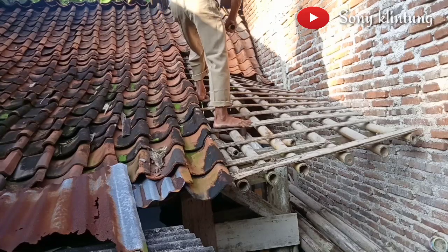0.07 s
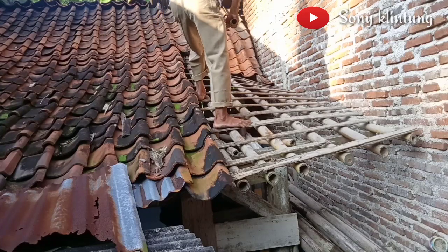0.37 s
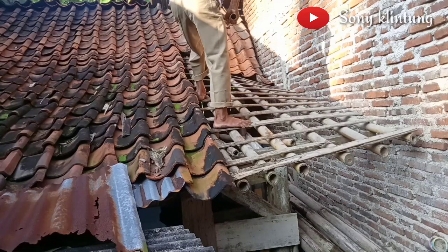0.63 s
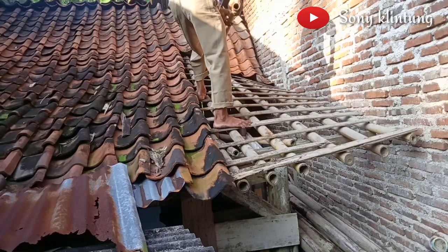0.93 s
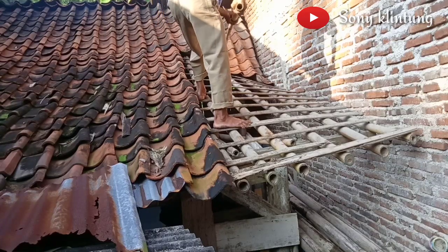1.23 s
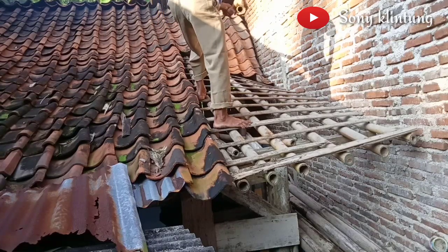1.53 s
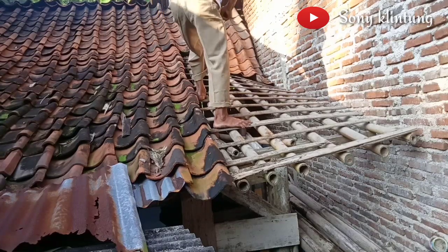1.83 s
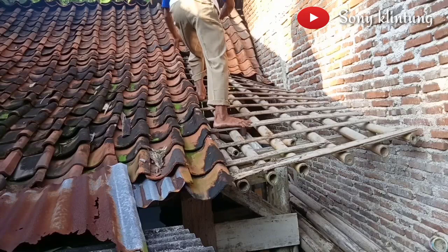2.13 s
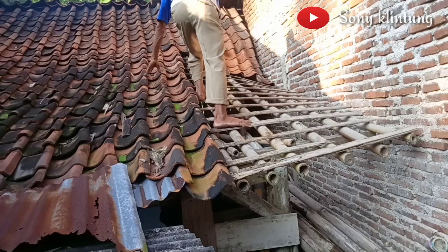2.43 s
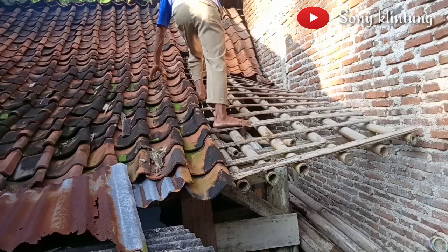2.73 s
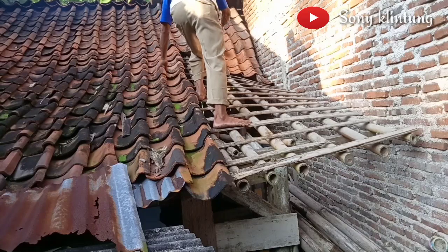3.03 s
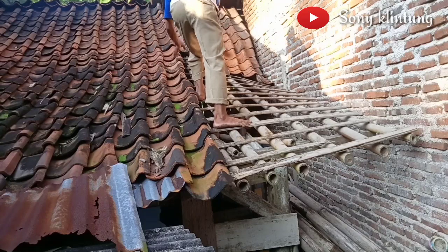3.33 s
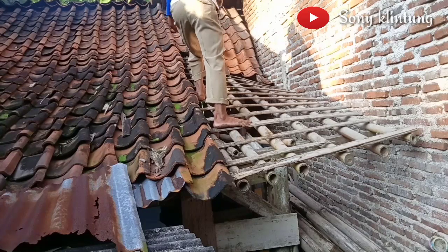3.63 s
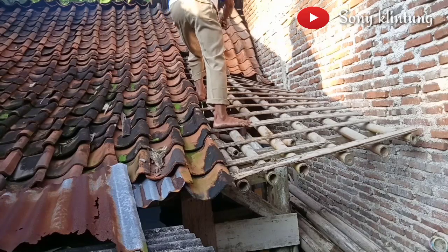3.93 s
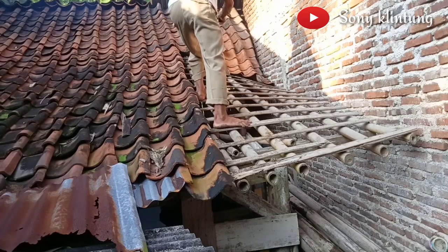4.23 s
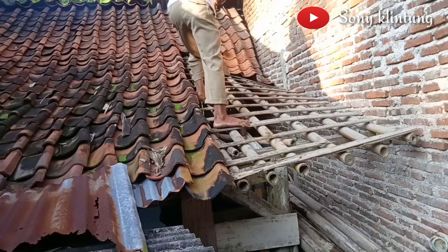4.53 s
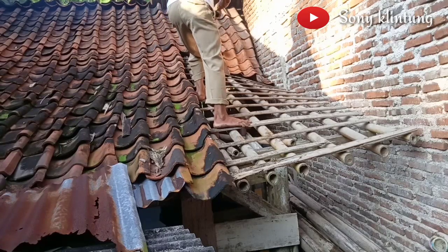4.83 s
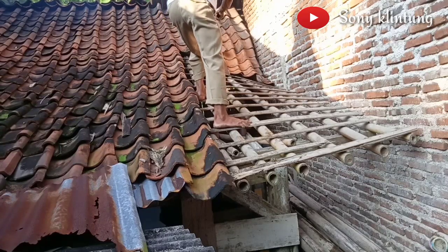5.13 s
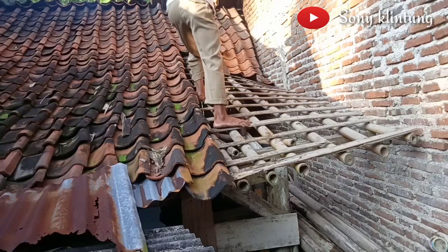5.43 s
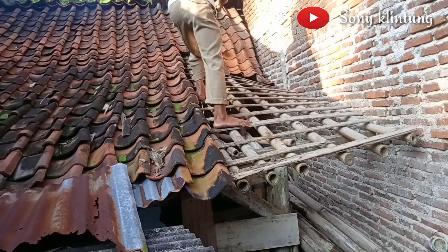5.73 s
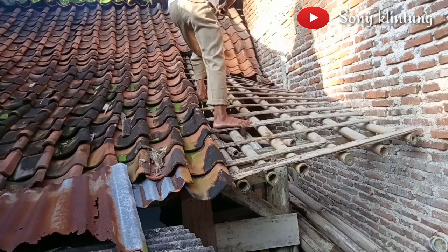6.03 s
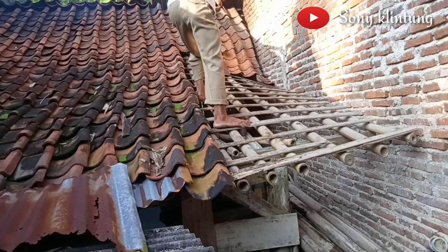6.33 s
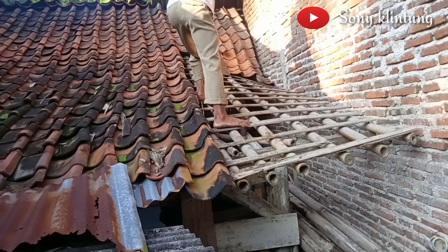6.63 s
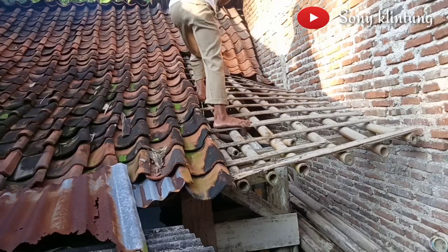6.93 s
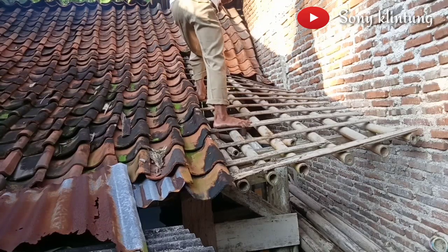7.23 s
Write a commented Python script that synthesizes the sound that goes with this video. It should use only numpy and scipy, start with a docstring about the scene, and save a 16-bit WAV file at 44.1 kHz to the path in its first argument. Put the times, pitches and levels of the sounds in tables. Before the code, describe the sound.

Gritty drags and ringing clinks of clay tiles moved by hand on a roof, with dull bamboo thuds underneath.

```python
"""Clay roof tiles handled on bamboo battens beside a brick wall, over a throbbing rumble and faint hiss.
A tile is dragged for the first second: sandy faces grind, edges knock, the battens thud underneath.
A lull follows, then light taps and shoves from 2.6 s and a second drag from 3.6 s.
From 4.5 s tiles are shoved and set down, clinking; now and then a rubbed one sings.
A last drag runs from 6.9 s to the end, with a squeak and a knock. One microphone hears it all."""
import sys
import numpy as np
from scipy import signal
from scipy.fft import rfft, irfft, next_fast_len
from scipy.io import wavfile
from scipy.ndimage import map_coordinates

SR = 44100
rng = np.random.default_rng(int(sys.argv[2]) if len(sys.argv) > 2 else 0)


def int16_out(signal):
    """Quantize to a 16-bit WAV file."""
    q = np.round(np.clip(np.atleast_2d(signal).T, -1, 1) * 32767)
    wavfile.write(sys.argv[1], SR, q.astype(np.int16))


N = 325899
TIME_S = np.arange(N) / SR


def amp(db):
    return 10 ** (np.asarray(db) / 20)


def unit(x, size=None):
    """Scale x so its first size samples have rms 1."""
    return x / np.sqrt(np.mean(x[:size] ** 2) + 1e-20)


def curves(rows):
    """One value per sample for each column after the time."""
    times_s, *columns = np.transpose(rows)
    return [np.interp(TIME_S, times_s, column) for column in columns]


def wobble(knots_per_s):
    """Smooth random curve."""
    knots = rng.standard_normal(int(N * knots_per_s / SR) + 4)
    return map_coordinates(knots, [TIME_S * knots_per_s])


def add(track, start_s, sound):
    part = track[max(0, round(start_s * SR)):][:len(sound)]
    part += sound[:len(part)]


def filtered(x, response):
    """Multiply the spectrum of x by response(hz)."""
    size = next_fast_len(len(x) + 4096)
    return irfft(rfft(x, size) * response(np.fft.rfftfreq(size, 1 / SR)), size)[:len(x)]


def body(spectrum, size=2048):
    """Minimum-phase impulse response from rows of freq_hz, gain_db."""
    hz, db = np.transpose(spectrum)
    gain = amp(np.interp(np.log(np.fft.rfftfreq(size, 1 / SR) + 1), np.log(hz), db))
    cepstrum = irfft(np.log(gain))
    cepstrum[1:size // 2] *= 2
    cepstrum[size // 2 + 1:] = 0
    return irfft(np.exp(rfft(cepstrum)))


def through(x, impulse_response):
    return signal.fftconvolve(x, impulse_response)[:len(x)]


# Background spectra: freq_hz, gain_db
RUMBLE_SPECTRUM = [(20, -30), (45, -22.5), (70, -10.5), (100, 0), (150, -1), (220, -15.5), (280, -8),
                   (370, -11), (600, -19.5), (1300, -29), (3000, -46)]
HISS_SPECTRUM = [(200, -3), (700, 2), (1500, -2), (2400, -6), (3300, 1), (5300, -17.5), (7700, -6.5),
                 (10000, -20), (13000, -21), (14500, -11.5), (16000, -21)]
# Background levels: time_s, rumble_db, drone_db
DISTANT_LEVELS = [(0, -58, -57.5), (1.2, -57.5, -60), (1.42, -58, -52.5), (1.65, -58, -55),
                  (1.8, -59, -59.5), (2.05, -59, -63), (2.3, -60, -58.5), (3.0, -59, -60), (4.1, -51, -56),
                  (4.45, -60.5, -68.5), (5.0, -55.5, -63), (6.0, -55.5, -63.5), (6.3, -60, -64),
                  (7.39, -52.5, -60)]


def outdoors(hiss_db=-68, throb_db=1.5, drone_hz=221, drone_width_hz=75):
    """Far throbbing rumble, hollow drone like a distant motor, faint even hiss."""
    rumble_db, drone_db = curves(DISTANT_LEVELS)
    rumble = through(rng.standard_normal(N), body(RUMBLE_SPECTRUM))
    rumble = unit(rumble * amp(throb_db * wobble(45)))
    drone_band = lambda hz: 1 / (1 + np.abs(2 * (hz - drone_hz) / drone_width_hz) ** 3)
    drone = unit(filtered(rng.standard_normal(N), drone_band))
    hiss = unit(through(rng.standard_normal(N), body(HISS_SPECTRUM)))
    return amp(rumble_db) * rumble + amp(drone_db) * drone + amp(hiss_db) * hiss


def contacts(rate_per_s, spread_db, size):
    """Tiny collisions, random in time and strength."""
    hit = rng.random(size) < rate_per_s / SR
    strength = amp(spread_db * rng.standard_normal(size))
    return hit * strength * rng.choice([-1, 1], size)


# Squeak partials: pitch_ratio, gain_db
SQUEAK_MODES = [(1, 3.5), (1.66, -10), (2.7, -20.5)]
# Squeaks of rubbed tiles, plus one short, broad knock at 7.12 s:
# start_s, length_s, pitch_hz, width_hz, level_db
SQUEAKS_AND_KNOCK = [(.002, .093, 2570, 229.7, -41), (.01, .07, 1380, 110, -42),
                     (0.181, .05, 1334, 180, -34.5), (0.412, .2, 2620, 450, -48),
                     (.905, .045, 1480, 36.5, -32), (4.216, 0.0606, 977, 60, -51),
                     (4.83, .24, 1830, 130, -60), (5.181, 0.038, 3310, 805, -42),
                     (5.182, 0.14, 1020, 170, -48.5), (5.219, 0.049, 2460, 260, -42.5),
                     (5.291, 0.031, 2850, 600, -40), (5.345, .04, 2760, 250, -39.5),
                     (5.304, .026, 13000, 1800, -54.5), (5.857, .2, 3020, 460, -55),
                     (7.031, 0.096, 1910, 280, -31.5), (7.12, 0.036, 1730, 1200, -28)]


def singing():
    """Uneven slips keep a tile ringing in a hoarse squeak; the last, broad burst sounds as a knock."""
    track = np.zeros(N)
    for start_s, length_s, pitch_hz, width_hz, level_db in SQUEAKS_AND_KNOCK:
        slips = contacts(3000, 4.2, SR // 2)
        band = lambda hz: (1j * hz * width_hz / (pitch_hz ** 2 - hz ** 2 + 1j * hz * width_hz)) ** 2
        ring = filtered(slips, lambda hz: sum(amp(db) * band(hz / ratio) for ratio, db in SQUEAK_MODES))
        progress = np.linspace(0, 1, round(length_s * SR))
        swell = np.sqrt(progress) * (1 - progress ** 2)
        add(track, start_s, amp(level_db) * unit(ring[-len(swell):] * swell))
    return track


# Bamboo batten spectrum: freq_hz, gain_db
BATTEN_SPECTRUM = [(45, -27.5), (100, -12), (170, -4.5), (260, -3.5), (400, -3), (530, -4.5), (750, -6.5),
                   (1500, -40)]


def battens(force):
    """The battens answer a force with a dull, low sound."""
    return through(force, body(BATTEN_SPECTRUM))


# Gritty hiss as the microphone colours it, with the microphone's peak near 8 kHz: freq_hz, gain_db
GRIT_AT_MIC_SPECTRUM = [(2500, -37), (4600, -12), (5700, -8), (6800, -4.5), (7900, 2.5), (8800, -5.5),
                        (10000, -13.5), (12500, -18.5), (15500, -13)]


def sand(force, level_db, rms_samples=None, dust_hz=10600, firm_rub_db=-40):
    """Grit hiss, coloured by the microphone; a light touch moves only fine dust and hisses higher."""
    grit = unit(through(force, body(GRIT_AT_MIC_SPECTRUM)), rms_samples)
    dust = filtered(grit, lambda hz: 1 - 1 / (1 + (hz / dust_hz) ** 8))
    lift_db = np.minimum(0.2 * (firm_rub_db - level_db) - 1, 6)
    return amp(level_db) * (grit + (amp(lift_db) - 1) * dust)


# Fired clay spectrum: freq_hz, gain_db
CLAY_SPECTRUM = [(250, -49), (480, -10), (600, -7.5), (850, 0), (1350, 0.5), (1900, -1.5), (2700, -1.5),
                 (3500, -3.5), (4200, -8.5), (5200, -21), (7500, -48)]
# Resonances shared by all tiles: freq_hz, t60_s, gain_db
CLAY_MODES = [(583, 0.035, -0.5), (834, 0.03, -3.5), (975, 0.052, -2), (1108, 0.22, -6.5),
              (1327, 0.16, -1.5), (1779, 0.081, 4), (1865, .06, -9), (2240, 0.25, -9.5), (2630, .06, -0.5),
              (2780, .05, -13), (3196, 0.065, -10), (3510, 0.08, -6), (3760, 0.028, -5.5)]


def fired_clay(force, resonance_db=-4):
    """A tile answers a force with a broad hard-clay colour and the shared resonances."""
    t = np.arange(SR // 8) / SR
    response = np.zeros(len(t))
    response[0] = 1
    for freq_hz, t60_s, gain_db in CLAY_MODES:
        fade = amp(-60 * t / t60_s)
        response += amp(resonance_db + gain_db) * 2 * fade / fade.sum() * np.cos(2 * np.pi * freq_hz * t)
    response = through(response, body(CLAY_SPECTRUM))
    bass_cut = signal.butter(2, 200, "highpass", fs=SR)  # a small plate radiates no bass
    return through(force, signal.lfilter(*bass_cut, response))


def brighten(x, bright_db, pivot_hz=2000):
    """Sharp contact favours a tile's high modes, flat contact its low ones."""
    low = filtered(x, lambda hz: 1 / (1 + (hz / pivot_hz) ** 4))
    return low * amp(-bright_db / 2) + (x - low) * amp(bright_db / 2)


def dense_ring(t60_s, count=150, low_hz=500, high_hz=15000):
    """Crowded weak modes with the given decay, drawn afresh on every call."""
    t = np.arange(min(round(t60_s * SR), SR // 3) + 2) / SR
    hz = low_hz * (high_hz / low_hz) ** ((np.arange(count) + rng.random(count)) / count)
    spectrum = np.zeros(SR // 2 + 1, complex)
    spectrum[hz.astype(int)] = np.sqrt(hz) * np.exp(2j * np.pi * rng.random(count))
    ring = irfft(spectrum)[:len(t)] * amp(-60 * t / t60_s)
    return ring / np.linalg.norm(ring)


def chatter(t, t60_s, ring_db, ring_t60_s, rise_share, wall_db=-26, wall_t60_s=0.34):
    """A blow is a tight cluster of contacts and roof reflections; tiles ring on, the wall answers."""
    fade = amp(-60 * np.maximum(t - 0.1 * t60_s, 0) / t60_s)
    cluster = fade * unit(contacts(5000, 1.7, len(t)))
    add(cluster, 0, amp(ring_db) * np.linalg.norm(cluster) * dense_ring(ring_t60_s, count=64))
    wall = amp(wall_db - 60 * t / wall_t60_s) * rng.standard_normal(len(t))
    rise = 1 - np.exp(-t / (rise_share * t60_s))  # longer blows start more softly
    return (cluster + wall) * rise


# Modes of one curved clay plate: pitch_ratio, gain_db
PLATE_MODES = [(1.002, 2.5), (1.4, -3), (1.84, -7.5), (2.119, -1), (2.908, 2), (3.55, -6), (4.12, -2.5)]


def clink(t, pitch_hz, centre_hz, t60_s, rise_s=0.0015, scatter_db=1, slope_db_per_octave=10):
    """The struck plate's own modes; the contact point favours those near centre_hz."""
    ratio, gain_db = np.transpose(PLATE_MODES)
    hz = ratio * pitch_hz
    octaves_off = np.abs(np.log2(hz / centre_hz))
    gain = amp(gain_db - slope_db_per_octave * octaves_off - scatter_db * rng.standard_normal(len(hz)))
    modes = gain @ np.sin(2 * np.pi * (hz[:, None] * t + rng.random((len(hz), 1))))
    return modes * amp(-60 * t / t60_s) * (1 - np.exp(-t / rise_s))


# Tile-on-tile blows:
# start_s, clay_db, bright_db, grit_db, batten_db, chatter_t60_s, pitch_hz, centre_hz, clink_db
TILE_KNOCKS = [(0.253, -25.5, -8.5, -35.5, -42.5, 0.23, 1037, 1200, -31),
               (0.786, -32.5, -2.5, -43.5, -46, 0.19, 890, 2500, -36),
               (0.849, -20.5, -11, -46.5, -32, .14, 1047, 2200, -31),
               (0.894, -22.5, -1, -38.5, -34.5, 0.093, 952, 1380, -24.5),
               (0.919, -30, -14, -56.5, -36.5, 0.21, 1062, 1600, -34.5),
               (1.102, -35, -13, -52, -46, 0.19, 890, 1200, -50),
               (1.242, -46, 6, -50.5, -55, .18, 980, 2500, -54),
               (2.593, -47.5, -6, -64.5, -43, 0.21, 962, 1390, -51),
               (2.703, -50.5, 6, -55, -48.5, 0.194, 833, 1790, -50),
               (2.726, -53, 2, -65, -49, 0.25, 848, 1500, -47.5),
               (2.841, -60, 6, -59, -63, 0.161, 842, 1800, -52),
               (2.856, -54, 10, -50.5, -60, .07, 840, 3000, -53),
               (2.917, -50, 7, -51.5, -62, 0.15, 1145, 2360, -52.5),
               (3.075, -58, -4, -61, -74, .12, 1014, 1900, -68),
               (3.224, -42, -3, -49.5, -60, 0.23, 966, 1490, -39.5),
               (3.238, -39.5, -1, -42.5, -63, 0.071, 965, 2000, -47),
               (3.325, -48, -12, -63, -64, .1, 969, 1300, -41.5),
               (3.428, -39.5, 3, -45, -42, 0.19, 969, 1330, -40.5),
               (3.558, -52, 8, -51, -70.5, 0.13, 1010, 2900, -60),
               (3.608, -42.5, 16, -53, -49.5, .1, 950, 1340, -46),
               (3.782, -31.5, 3.5, -39.5, -39.5, .1, 1067, 1900, -41),
               (3.8414, -21.5, 0.5, -30, -43.5, 0.039, 878, 1850, -20),
               (3.883, -30, -5.5, -51.5, -43, 0.04, 902, 1900, -28.5),
               (4.187, -43.5, 3, -43, -50, .081, 973, 990, -34.5),
               (4.194, -51.5, 3, -47, -54.5, 0.062, 960, 2800, -39),
               (4.547, -36, -9, -48, -37.5, 0.15, 1019, 1490, -41),
               (4.566, -44, -5, -49.5, -39, 0.096, 988, 1170, -36),
               (4.659, -57, 4, -57, -43, 0.2, 556, 560, -50),
               (4.688, -62, 6, -53, -59, .08, 990, 3000, -66),
               (4.761, -44, -3, -55.5, -63.5, 0.2, 835, 2820, -55),
               (5.067, -31.5, 0, -35, -44, 0.13, 1017, 3340, -45),
               (5.182, -52, 12, -46.5, -66, .08, 1020, 3000, -50),
               (5.301, -41.5, 21, -45, -59, 0.086, 987, 3000, -41.5),
               (5.355, -37, -1, -35.5, -48, 0.097, 928, 2700, -39.5),
               (5.473, -39, -10, -65.5, -41.5, 0.15, 816, 820, -38.5),
               (5.551, -24.5, -5.5, -42, -41, .14, 934, 1620, -31.5),
               (5.597, -33, -18, -59, -43, 0.12, 837, 1200, -40),
               (5.74, -38, -10, -56.5, -39.5, 0.18, 848, 840, -39.5),
               (5.799, -45, 5, -58.5, -60.5, .087, 1005, 2880, -52),
               (5.851, -52, -5, -58, -45.5, 0.092, 677, 700, -57),
               (6.002, -47, 8, -52, -67, 0.074, 1016, 3000, -54),
               (6.394, -55.5, 21, -50.5, -60, 0.077, 1120, 4000, -63),
               (6.431, -52.5, 10.3, -48, -69, 0.087, 1030, 3000, -56),
               (6.5534, -26, -0.5, -43.5, -43.5, 0.073, 827, 1090, -29.5),
               (6.558, -32.5, 2, -49, -53, 0.13, 834.5, 3450, -33)]


def knocks(flex_hz=182, flex_db=-7, flex_t60_s=0.12, touch_lead_s=0.0026, touch_db=-19):
    """Each knock sounds the clay, crushes grit, flexes the battens and clinks at the tile's pitch."""
    track = np.zeros(N)
    t = np.arange(SR // 3) / SR
    head = SR // 40  # levels apply to the first 25 ms
    flex_envelope = amp(-60 * t / flex_t60_s) * (1 - np.exp(-t / 0.0048))
    flex = amp(flex_db) * unit(flex_envelope * np.sin(2 * np.pi * flex_hz * t), head)
    for start_s, clay_db, bright_db, grit_db, batten_db, t60_s, pitch_hz, centre_hz, clink_db in TILE_KNOCKS:
        clay = fired_clay(chatter(t, t60_s, ring_db=-2, ring_t60_s=0.15, rise_share=0.012))
        clay = unit(brighten(clay, bright_db), head)
        grit = sand(chatter(t, t60_s, ring_db=-7, ring_t60_s=0.09, rise_share=0.005), grit_db, head)
        thud = battens(chatter(t, 1.1 * t60_s, ring_db=-11, ring_t60_s=0.05, rise_share=0.016))
        thud = unit(unit(thud, head) + flex, head)
        clink_t60_s = 0.05 + 0.75 * t60_s  # a tightly pinned tile rings less
        ring = unit(clink(t, pitch_hz, centre_hz, clink_t60_s), head)
        blow = amp(clay_db) * clay + grit + amp(batten_db) * thud + amp(clink_db) * ring
        add(track, start_s - touch_lead_s, amp(touch_db) * blow)  # one corner lands first
        add(track, start_s, blow)
    return track


def shove(attack_s, hold_s, speed_exponent=1.17):
    """Gain of a tile that speeds up, slides and stops; loudness follows a power of speed."""
    stop_t60_s = 0.13 + 1.6 * attack_s  # a gentle shove also stops gently
    t = np.arange(round((attack_s + hold_s + stop_t60_s) * SR)) / SR
    speed = np.minimum(t / attack_s, 1)
    return speed ** speed_exponent * amp(-60 * np.maximum(t - attack_s - hold_s, 0) / stop_t60_s)


# Short shoves: start_s, attack_s, hold_s, clay_db, bright_db, grit_db, batten_db
TILE_SHOVES = [(1.059, 0.028, 0.049, -41.5, 0, -51, -42.5), (1.41, 0.15, 0.047, -64.5, 3, -59.5, -69.5),
               (1.753, .015, .015, -68, 4, -64, -76), (1.82, 0.042, .11, -78, 4, -69, -80),
               (1.88, 0.047, 0.013, -63, -24, -81, -63), (2.224, 0.01, 0.0068, -65, 11, -61, -72),
               (2.708, 0.0229, .03, -43, -5.5, -56, -44.5), (2.845, 0.015, 0.0079, -44.5, 2, -51.5, -49),
               (2.917, 0.02, .05, -52, 6, -56, -64.5), (3.064, 0.029, .012, -51.5, 1, -58, -66.5),
               (3.213, 0.037, 0.091, -38, -8, -50, -53.5), (3.431, 0.015, 0.014, -43, -7, -52, -47),
               (3.566, 0.022, .035, -45, 2, -56, -71), (4.168, 0.0236, 0.016, -37.5, -5, -44, -46.5),
               (4.587, 0.039, 0.22, -54.5, 0, -61, -54.5), (4.809, .15, 0.075, -51, 11, -52, -73.5),
               (5.098, .022, .008, -42, -5, -50.5, -55.5), (5.176, 0.0047, 0.0068, -56.5, 9, -46, -53),
               (5.209, 0.013, 0.045, -42.5, 12, -39.5, -62), (5.328, 0.055, 0.011, -37, -8, -47, -45.5),
               (5.62, 0.078, 0.035, -34.5, 5.5, -43.5, -46.5), (5.789, 0.018, 0.23, -50.5, 7, -52.5, -60),
               (6.073, 0.035, 0.16, -67.5, 6, -68.5, -77), (6.142, 0.039, .012, -60, 22, -57, -77),
               (6.261, 0.061, .025, -54.5, 16, -52.5, -62), (6.425, 0.025, 0.074, -69, 7, -65, -68),
               (6.531, 0.097, .02, -44.5, -1, -49, -52), (6.74, 0.075, .012, -37, 1.5, -45, -49)]
# Three long drags, one list each: time_s, clay_db, bright_db, grit_db, batten_db
TILE_DRAGS = [
    [(0, -33, 3, -39, -44.5), (.16, -34.5, 6.5, -39.5, -52.5), (.26, -28.5, 8, -36, -47.5),
     (.5, -37, 4.5, -43, -53.5), (.75, -35, 13.5, -38, -50), (.85, -37, -7, -49, -47.5),
     (1.0, -40, 0, -45.5, -52), (1.07, -45, 5, -52.5, -54.5)],
    [(3.64, -54.5, -14, -61, -58), (3.71, -35, 10, -43.5, -50), (3.77, -40, 1, -51, -48.5),
     (3.82, -30, -0.5, -40.5, -42.5), (3.94, -32, 0, -44, -47), (4.03, -28.5, 1, -38.5, -48.5),
     (4.11, -33, 1, -41, -51.5), (4.18, -46, 0.5, -51, -54)],
    [(6.86, -52, -11, -57.5, -49.5), (6.91, -33, 8, -40.5, -54.5), (7.05, -27.5, 4, -35, -46),
     (7.1, -29, -2.5, -35, -42.5), (7.135, -23.5, 2.5, -35.5, -35), (7.175, -28.5, 0.5, -39, -46),
     (7.22, -26, 1.5, -37.5, -41), (7.27, -35.5, -1, -47, -45), (7.33, -29, 10, -32.5, -46),
     (7.39, -32.5, 2.5, -44, -51.5)],
]


def sliding():
    """Summed clay, grit and batten gains of all shoves and drags, and their brightness in dB."""
    clay, grit, batten, weighted_bright = np.zeros((4, N))
    moves = [(start_s, shove(attack_s, hold_s), *levels)
             for start_s, attack_s, hold_s, *levels in TILE_SHOVES]
    for drag in TILE_DRAGS:
        moving = (TIME_S >= drag[0][0]) & (TIME_S <= drag[-1][0])
        moves.append((0, moving, *curves(drag)))
    for start_s, motion, clay_db, bright_db, grit_db, batten_db in moves:
        add(clay, start_s, motion * amp(clay_db))
        add(grit, start_s, motion * amp(grit_db))
        add(batten, start_s, motion * amp(batten_db))
        add(weighted_bright, start_s, motion * amp(clay_db) * bright_db)
    return clay, grit, batten, weighted_bright / (clay + 1e-12)


def rubbed(catches, t60_s, ring_db=-4.5, hop=5000):
    """Grains ring on in crowded close modes, like nearby reflections, that change from moment to moment."""
    ring = np.zeros(N)
    for start in range(0, N, hop):
        stretch = catches[start:start + 2 * hop]
        stretch = np.pad(stretch * np.sqrt(np.hanning(len(stretch))), (0, hop))
        add(ring, start / SR, through(stretch, dense_ring(t60_s)))
    return catches + amp(ring_db) * ring


def scraping(judder_db=0.9):
    """Sand grains catch between sliding faces: clay rasps, grit hisses, battens grumble."""
    clay_gain, grit_gain, batten_gain, bright_db = sliding()
    clay = unit(fired_clay(rubbed(contacts(3500, 4, N), t60_s=0.091)))
    tilt_power = np.cosh(bright_db * np.log(10) / 20)
    clay = brighten(clay, bright_db) / np.sqrt(tilt_power)
    grit_db = 20 * np.log10(grit_gain + 1e-9)
    grit = sand(rubbed(contacts(7000, 2.9, N), t60_s=0.062), grit_db)
    grumble = unit(battens(contacts(1500, 3.8, N)))
    judder = amp(judder_db * wobble(110))  # stick and slip
    return judder * (clay_gain * clay + grit + batten_gain * grumble)


def scene():
    """Tiles and background, the same in both channels."""
    mono = scraping() + knocks() + singing() + outdoors()
    return np.array([mono, mono])


def record(dry, low_cut_hz=45, top_hz=15800):
    """The small microphone loses the deepest bass; nothing passes above top_hz."""
    response = lambda hz: hz ** 2 / np.hypot(hz ** 2, low_cut_hz ** 2) * (hz < top_hz)
    return np.array([filtered(channel, response) for channel in dry])


dry = scene()
out = record(dry)
int16_out(out)
```